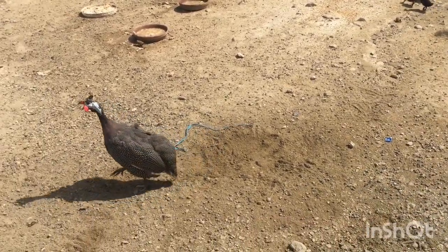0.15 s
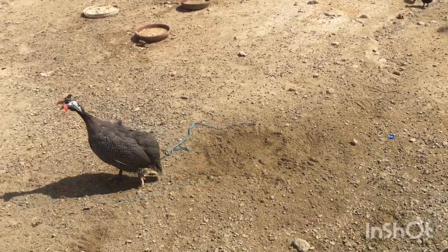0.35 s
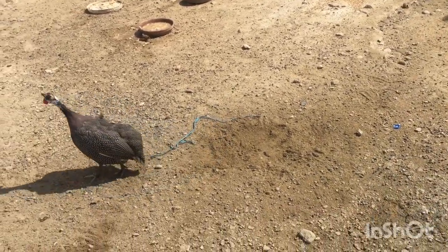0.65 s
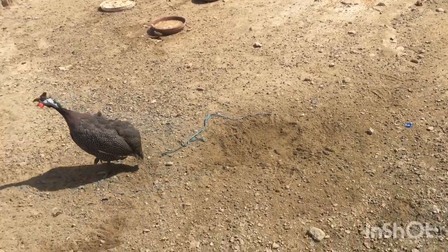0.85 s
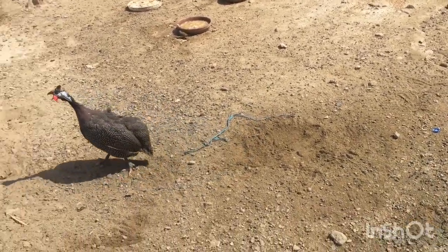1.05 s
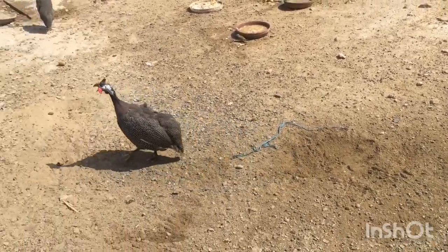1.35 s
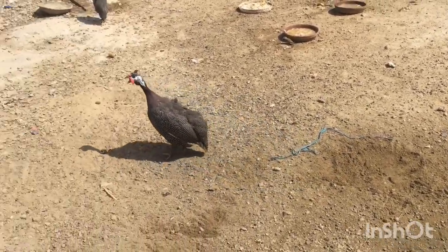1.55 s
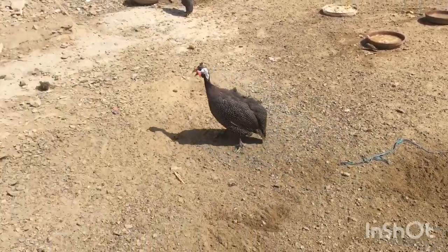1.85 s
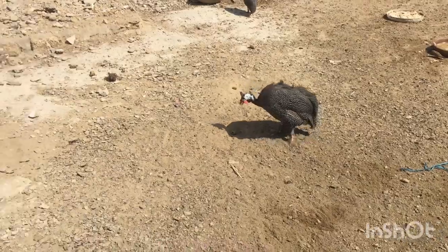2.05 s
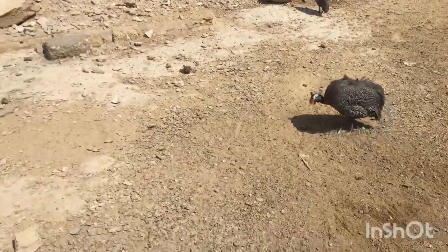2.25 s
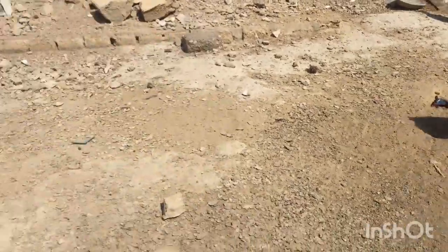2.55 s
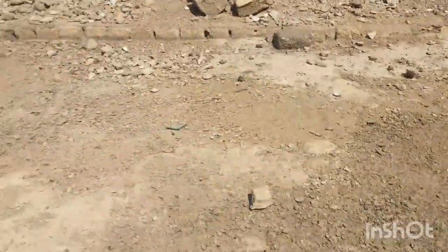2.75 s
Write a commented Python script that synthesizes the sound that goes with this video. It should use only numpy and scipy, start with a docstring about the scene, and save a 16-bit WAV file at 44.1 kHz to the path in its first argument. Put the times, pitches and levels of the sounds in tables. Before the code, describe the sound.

Harsh rapid guineafowl cackling in an open dirt yard, ending abruptly in tiny squeaks and quiet

```python
"""A guineafowl rattles off a fast run of harsh calls in a dirt yard, then ends on a few soft squeaks.
In each call the pitch rises and falls once, while uneven pulses ring the throat and the opening beak.
Squeaks are gliding tones with overtones; the thin peeps of distant birds are gliding sine waves.
Faint scuffs are bursts of random grit grains, and a low rumble of shaped noise lies under it all.
Wall echoes and a fading noise tail add the yard around the bird, the peeps and the scuffs."""
import sys
import numpy as np
from scipy import signal
from scipy.fft import rfft, irfft
from scipy.io import wavfile
from scipy.ndimage import uniform_filter1d, minimum_filter1d

SR = 44100
rng = np.random.default_rng(int(sys.argv[2]) if len(sys.argv) > 2 else 0)


def master(y):
    """Save y as 16-bit WAV."""
    cut = np.clip(np.atleast_2d(y).T, -1, 1)
    pcm = np.round(cut * 32767)  # scale
    wavfile.write(sys.argv[1], SR, pcm.astype(np.int16))


N = 127890  # length of the scene in samples


def amp(db):
    """Turns decibels into a gain."""
    return 10 ** (np.asarray(db) / 20)


def unit(x):
    """Scales a sound to an rms level of 1."""
    return x / np.sqrt(np.mean(x ** 2) + 1e-20)


def read(points, hz, axis=1):
    """Reads one column of a spectrum table, with frequency on a logarithmic axis."""
    table = np.transpose(points)
    return np.interp(np.log(hz + 1), np.log(table[0] + 1), table[axis])


def add(mix, start_s, sound):
    """Mixes a sound in at its start time; a negative start cuts off its beginning."""
    at = round(start_s * SR)
    sound = sound[max(-at, 0):]
    part = mix[max(at, 0):][:len(sound)]
    part += sound[:len(part)]


def drift(span_s, size=N):
    """Makes a smooth random motion of rms 1; a longer span makes it slower."""
    hz = np.fft.rfftfreq(size, 1 / SR)
    spectrum = rfft(rng.standard_normal(size)) * np.exp(-(hz * span_s) ** 2)
    return unit(irfft(spectrum, size))


def colour(x, points, tilt_db=0, size=2048):
    """Filters a sound to a given spectrum, plus a tilt in dB per octave about 2 kHz, without pre-ringing."""
    hz = abs(np.fft.fftfreq(size, 1 / SR))
    octaves = np.log2((hz + 50) / 2000)
    log_gain = np.log(amp(read(points, hz) + tilt_db * octaves))
    response = np.exp(np.conj(signal.hilbert(log_gain)))  # minimum phase
    taps = np.fft.ifft(response).real
    return signal.fftconvolve(x, taps[:size // 2])[:len(x)]


def resonate(x, hz, width_hz):
    """Rings a steep resonance, of gain 1 at its centre, that can follow a moving frequency."""
    turn = np.exp(2j * np.pi * np.cumsum(hz * np.ones(len(x))) / SR)
    r = np.exp(-np.pi * width_hz * np.pi / 2 / SR)  # widened because two equal poles narrow the peak
    steady = signal.lfilter([(1 - r) ** 2], [1, -2 * r, r * r], x / turn)  # centre moved to 0 Hz
    return 2 * (turn * steady).real


def guineafowl_calls():
    """The run of harsh calls, each with its own pitch, resonances and roughness."""
    # calls: start/s, length/s, level/dB, top pitch/Hz, throat resonance/Hz, low resonance/dB,
    # beak resonances/dB, beak tuning/share, brightness/dB per octave, roughness/factor
    call_rows = [(-.043, 0.066, -12, 426, 2234, -12, 1.5, 1, -0.5, 1.2),
                 (.085, 0.064, -14, 422.6, 2277, -9.5, 1, 0.98, 0.5, 0.72),
                 (0.226, 0.066, -13.5, 428.7, 2254, -9, 1.5, 0.99, 0, 0.6),
                 (.366, 0.07, -15, 428.3, 2284, -9, 1.5, 0.99, 1, 1.2),
                 (0.511, .067, -15.5, 417.2, 2295, -6, 2.5, 0.99, 1, 1.04),
                 (0.648, 0.08, -15, 434.7, 2274, -6, 0, 1, 0, 1.2),
                 (.807, .098, -14.5, 443.6, 2297, -7, -1, 0.99, 0.5, 2.1),
                 (0.986, 0.075, -14, 440.8, 2353, -5.5, -1.5, 0.98, 0, 1.7),
                 (1.139, 0.074, -15.5, 417.8, 2316, -5.5, 1, 0.97, 0.5, 1.2),
                 (1.294, .071, -15.5, 420.2, 2290, -3.5, 0, 1, 0, 1.2),
                 (1.44, 0.076, -14.5, 413.1, 2354, -3.5, 1, 1.007, .5, 0.89),
                 (1.587, 0.081, -15, 412.3, 2360, -3, 2, 1, 1, 1.46),
                 (1.751, 0.067, -16, 412.2, 2410, 1.5, 3, 1.01, 2, 0.79),
                 (1.9, 0.059, -16.5, 403.6, 2320, -1, 2.5, 0.99, 1, 1.47)]
    mix = np.zeros(N)
    for start, *settings in call_rows:
        add(mix, start, call(*settings))
    return mix


def call(length, level_db, top_hz, throat_hz, low_db, beak_db, tuning, tilt_db, roughness, size=6000):
    """One harsh call: the beak snaps open, the pitch arches, and the voice dulls as it dies."""
    # resonances that rise as the beak opens: open centre before tuning f/Hz, width/Hz, level/dB
    beak_rings = [(3366, 160, -7.5), (4134, 280, -2), (4566, 247, 1.5), (5200, 530, 3), (5920, 250, -11.5),
                  (6690, 140, -20)]
    # broad colour of the voice between the resonances: f/Hz, level/dB
    voice_colour = [(200, -40.5), (420, -24.5), (600, -28.5), (850, -23.5), (1100, -21), (1400, -32.5),
                    (2000, -27), (2900, -4.5), (4500, -21), (6800, -20), (7800, -35.5), (9000, -27),
                    (10300, -34), (11700, -28), (13200, -37), (15500, -42.5)]
    t = np.arange(size) / SR
    u = np.minimum(t / length, 1.3)  # place in the call; the motion stops a little past its end

    crest = 0.4856  # place of the highest pitch, as a share of the call
    rising = np.maximum(1 - u / crest, 0) ** 4
    falling = np.maximum((u - crest) / (1 - crest), 0) ** 2
    arch = 1 - 0.15 * rising - 0.1235 * falling
    hz = top_hz * arch * (1 + 0.006 * drift(0.003, size))  # slight random waver

    attack_s, release_s, release_lead_s = 0.011, 0.046, 0.011  # release starts before the call's end
    release = np.clip(1 - (t - length + release_lead_s) / release_s, 0, 1) ** 2
    shape = np.minimum(t / attack_s, 1) * release

    # the higher overtones come in late and leave early
    bright_hz, bright_rise_s, bright_fade = 2980, 0.015, 3.6
    bright = np.minimum(t / bright_rise_s, 1) ** 2 * release ** bright_fade
    pulses = windpipe(syrinx(t, hz, roughness))
    dull = signal.sosfiltfilt(signal.butter(1, bright_hz, fs=SR, output="sos"), pulses)
    drive = shape * (dull + bright * (pulses - dull))

    voice = colour(drive, voice_colour, tilt_db)
    voice += amp(low_db) * resonate(drive, 1623, width_hz=142)
    # the throat rings hardest just after the onset
    accent_db = 5 * np.exp(-((t - 0.015) / 0.0073) ** 2)
    voice += amp(4 + accent_db) * resonate(drive, throat_hz, width_hz=263)
    # low partials swell as the pitch sinks at the end
    voice += amp(-15) * resonate(pulses * falling * release, 1520, width_hz=280)

    # the beak resonances sweep up from a lower start, then drop and dim as the beak closes
    closed_share, open_s, shut_share, shut_db = 0.52, 0.0073, 0.16, -0.5
    opening = tuning * (1 - closed_share * np.exp(-t / open_s) - shut_share * falling)
    for beak_hz, width_hz, db in beak_rings:
        wander, flutter = drift(0.006, size), drift(0.006, size)  # each is a little unsteady
        ring_hz = beak_hz * opening * (1 + 0.013 * wander)
        ring = resonate(shape * pulses, ring_hz, width_hz)
        ring_db = db + beak_db + shut_db * falling + 2 * flutter
        voice += amp(ring_db) * ring * release ** (bright_fade / 2)
    # the level is set relative to the loudness envelope
    return amp(level_db) * voice * np.linalg.norm(shape) / np.linalg.norm(voice)


def syrinx(t, hz, roughness, size=64):
    """The voice organ gives one sharp, uneven pulse and one puff of noise per cycle."""
    jitter, shimmer, rasp = 0.013, 0.16, 0.13  # unevenness in time and size; power factor of the noise
    onset_jitter, settle_s = 0.07, 0.014  # extra timing unevenness, which dies away after the onset
    turns = np.cumsum(hz) / SR
    slip, force = rng.standard_normal((2, size))
    at = np.interp(np.arange(size), turns, t, right=1)  # spare pulses go to 1 s, past the call
    at = at + slip * (roughness * jitter + onset_jitter * np.exp(-at / settle_s)) / hz.max()
    offset = (t - at[:, None]) * SR
    pulses = np.exp(shimmer * force) @ (np.sinc(offset) * (abs(offset) < 20))
    puff_shape = np.exp(-(turns % 1) / 0.91)  # noise fades through each cycle
    puffs = puff_shape * rng.standard_normal(len(t))
    hiss = 2 * unit(np.diff(puffs, prepend=0))  # treble part of the puffs
    return unit(pulses) + np.sqrt(rasp) * (unit(puffs) / 2 + hiss)


def windpipe(x):
    """Spreads each pulse in time with all-pass filters, then takes out the slow flow below 250 Hz."""
    # places where the windpipe holds each pulse back: f/Hz, width/Hz
    smear = [(2300, 750), (4700, 1250), (5600, 300), (9000, 9000), (12000, 8400)]
    for hz, width_hz in smear:
        r = np.exp(-np.pi * width_hz / SR)
        poles = np.array([1, -2 * r * np.cos(2 * np.pi * hz / SR), r * r])
        x = signal.lfilter(poles[::-1], poles, x)
    return signal.sosfilt(signal.butter(2, 250, "high", fs=SR, output="sos"), x)


def closing_squeaks():
    """The soft squeaks after the calls: short gliding tones with weaker overtones."""
    # squeaks: start/s, length/s, level/dB, pitch f/Hz, glide/share, overtone slope/dB per octave
    squeak_rows = [(2.072, 0.0086, -37.5, 3373, 0.01, -27), (2.075, 0.016, -27, 1412, 0.052, -16.5),
                   (2.086, 0.024, -36.5, 1409, -0.042, -10), (2.089, 0.0087, -31, 4420, -0.18, -23),
                   (2.096, 0.011, -34, 4250, 0.0051, -19), (2.114, .007, -30.5, 3230, -0.093, -21),
                   (2.1168, 0.011, -30, 1393, -0.054, -9.5), (2.236, 0.0076, -39.5, 3340, 0.098, -23),
                   (2.237, 0.0081, -46, 1370, 0.026, -2.5)]
    mix = np.zeros(N)
    for start, *settings in squeak_rows:
        add(mix, start, whistle(*settings, waver=0.0077))
    return mix


def distant_peeps():
    """The thin peeps of distant birds: faint gliding sine waves without overtones."""
    # peeps: start/s, length/s, level/dB, pitch f/Hz, glide/share, arch/share, waver/share
    peep_rows = [(2.177, .17, -58.5, 6360, -0.013, 0, 0.031), (2.281, 0.17, -56.5, 3680, .01, 0, 0.022),
                 (2.317, .06, -61, 2700, -0.15, 0.029, .01), (2.388, 0.22, -62.5, 3640, -0.045, 0, 0.011),
                 (2.64, 0.058, -65, 2510, -0.125, .04, .01),
                 (2.718, 0.076, -61.5, 2800, 0.0091, 0.086, .01),
                 (2.83, 0.074, -57, 4480, .08, 0.035, .025)]
    mix = np.zeros(N)
    for start, length, level_db, hz, glide, arch, waver in peep_rows:
        add(mix, start, whistle(length, level_db, hz, glide, 0, waver, arch, count=1))
    return mix


def whistle(length, level_db, hz, glide, overtones_db, waver, arch=0, count=4):
    """A short note that swells and fades while its pitch glides, wavers and may arch."""
    u = np.arange(0, length, 1 / SR) / length
    bend = glide * (u - 0.5) + arch * np.sin(np.pi * u) + waver * drift(0.002)[:len(u)]
    phase = 2 * np.pi * np.cumsum(hz * (1 + bend)) / SR
    tone = np.zeros(len(u))
    for k in range(1, count + 1):
        if k * hz < SR / 2:
            tone += amp(overtones_db * np.log2(k)) * np.sin(k * phase)
    return amp(level_db) * unit(tone * np.sin(np.pi * u))


def grit_scuffs():
    """The faint scuffs on the grit, each a brief crowd of grains."""
    # scuffs: start/s, length/s, level before the swell and fade/dB, treble tilt/dB per octave
    scuff_rows = [(2.409, 0.029, -48, 1), (2.58, 0.03, -46, -1.5), (2.774, 0.013, -46.5, -1.5),
                  (2.814, 0.079, -46.5, 2)]
    mix = np.zeros(N)
    for start, *settings in scuff_rows:
        add(mix, start, scuff(*settings))
    return mix


def scuff(length, level_db, tilt_db, size=6000):
    """Random grains of uneven strength, coloured like grit, swell and fade together."""
    # colour of the grit: f/Hz, level/dB
    grit_colour = [(150, -17), (700, 2.5), (1500, 1.5), (2300, -0.5), (4500, -8), (7000, -13.5),
                   (15000, -23)]
    grains_per_s = 6000
    u = np.minimum(np.arange(size) / SR / length, 1)
    grains = rng.standard_normal(size)
    grains *= amp(3 * np.minimum(rng.exponential(1, size), 3))  # up to 9 dB of extra strength
    grains *= rng.random(size) < grains_per_s / SR
    return amp(level_db) * np.sin(np.pi * u) * unit(colour(grains, grit_colour, tilt_db))


def yard(x):
    """The yard's sound alone: a few wall echoes and a noise tail that fades at its own rate per band."""
    # wall echoes: delay t/s, level/dB
    wall_echoes = [(.0047, -25.5), (.0125, -19), (.026, -20.5), (0.042, -19.5)]
    # diffuse tail: f/Hz, level/dB, time to fade by 60 dB t/s
    tail_bands = [(191, -2.5, 1), (420, 3, 0.24), (848, -15.5, 0.8), (1440, -12.5, 0.47), (2200, -15.5, 1),
                  (3000, -14, 0.87), (4100, -15.5, .6), (4570, -7, 0.44), (4750, -19.5, 0.5),
                  (5300, -10.5, 1), (6500, -14, 0.81), (7560, -18, 0.78), (11140, -4.5, 0.39),
                  (15000, -5, 0.21)]
    hz, t, noise = signal.stft(rng.standard_normal(SR), SR, nperseg=256)
    fade_s = read(tail_bands, hz, axis=2)[:, None]
    decay = amp(-60 * t / fade_s) * np.minimum(t / 0.01, 1)  # builds up over 10 ms
    energy = SR * np.mean(decay ** 2, axis=1, keepdims=True)
    decay *= amp(read(tail_bands, hz))[:, None] / np.sqrt(energy)
    response = signal.istft(noise * decay, SR, nperseg=256)[1]
    for delay, db in wall_echoes:
        response[round(delay * SR)] += amp(db)
    return signal.fftconvolve(x, response)[:N]


def air():
    """Low outdoor rumble from shaped noise, with a faint wavering hum, a little louder after the calls."""
    # colour of the rumble: f/Hz, relative level/dB per Hz
    rumble_colour = [(15, -47), (25, -16), (45, -8), (75, 2.5), (130, -4.5), (250, -8), (420, -20.5),
                     (600, -24.5), (1200, -26.5), (2000, -28), (3500, -34), (4500, -40), (8000, -48),
                     (15000, -51.5)]
    # rumble level over time, before a lift of 1 dB: t/s, level/dB
    level_points = [(0, -48.5), (2.05, -48), (2.25, -44.5)]
    hz, t = np.fft.rfftfreq(N, 1 / SR), np.arange(N) / SR
    rumble = unit(irfft(rfft(rng.standard_normal(N)) * amp(read(rumble_colour, hz)), N))
    hum_hz = 211.8 * (1 + 0.011 * drift(0.1))
    hum = unit(np.sin(2 * np.pi * np.cumsum(hum_hz) / SR))
    level_db = 1 + np.interp(t, *np.transpose(level_points))
    return amp(level_db) * (rumble + amp(-13.5) * hum)


def scene():
    """The bird, the grit and the distant peeps in the yard, over the rumble."""
    calls, squeaks = guineafowl_calls(), closing_squeaks()
    rest = distant_peeps() + grit_scuffs()
    wet = yard(calls + amp(-3.5) * squeaks + rest)  # the squeaks stir the yard a little less
    return (calls + squeaks + rest + wet + air())[None]


def record(dry):
    """A quick limiter holds down the peaks, then a low-pass filter removes the highest treble."""
    limit_db, limit_s, edge_hz = -4, 0.0014, 15650  # ceiling, reaction time, top of the band
    span = max(round(limit_s * SR), 2)
    gain = np.minimum(amp(limit_db) / (abs(dry) + 1e-9), 1)
    gain = uniform_filter1d(minimum_filter1d(gain, span), span)
    lowpass = signal.firwin(511, edge_hz, window=("kaiser", 9), fs=SR)
    return signal.oaconvolve(dry * gain, lowpass[None], "same")


dry = scene()
out = record(dry)
master(out)
```